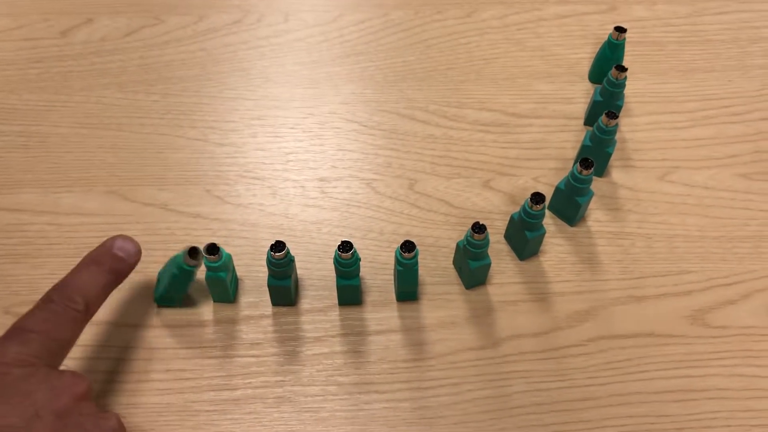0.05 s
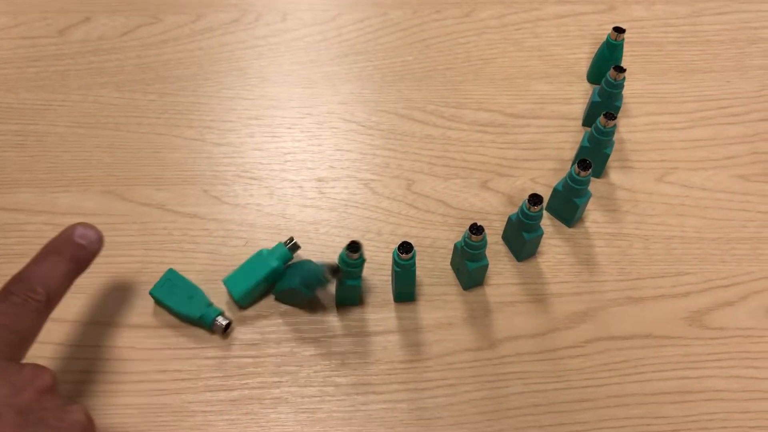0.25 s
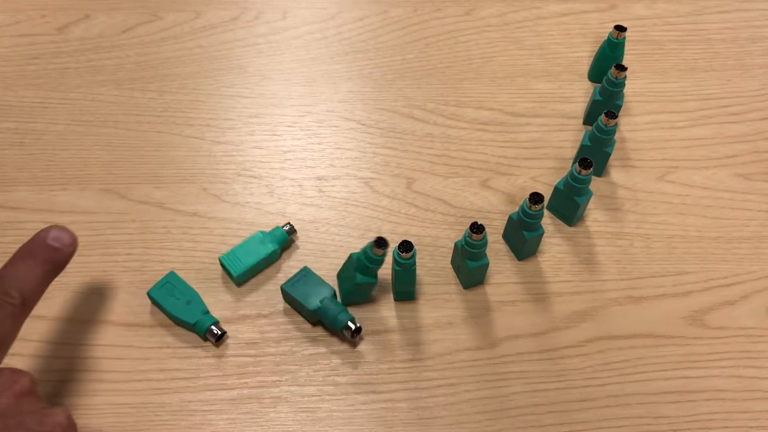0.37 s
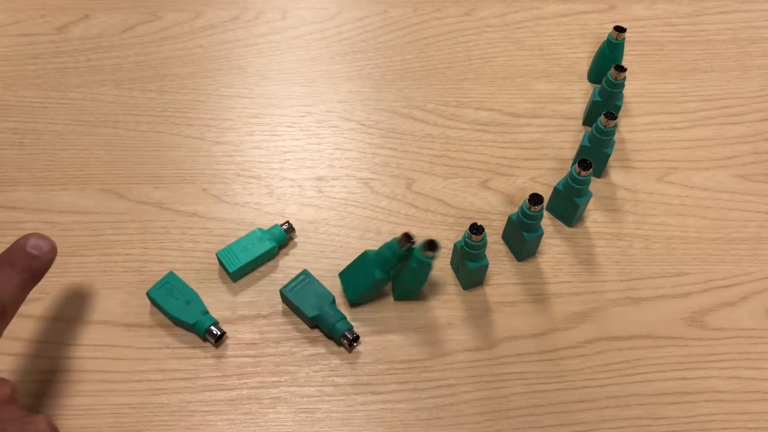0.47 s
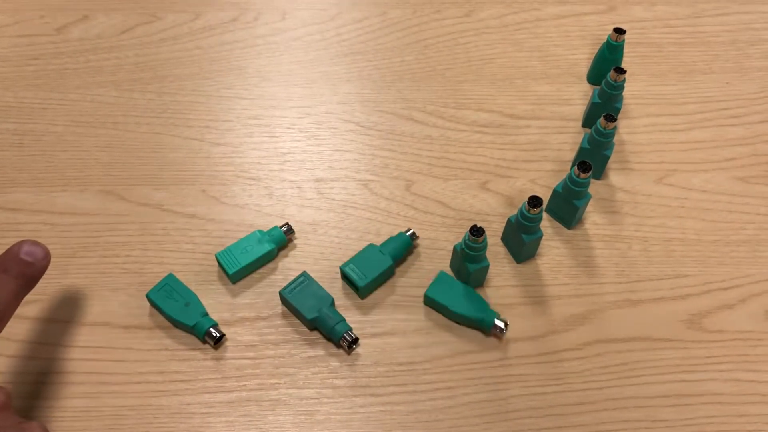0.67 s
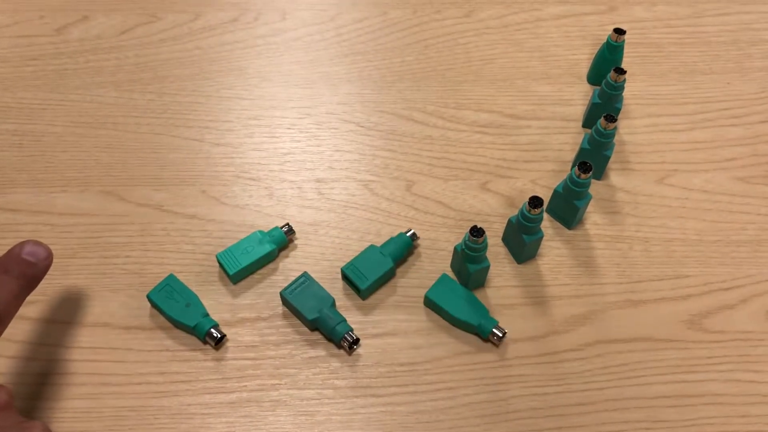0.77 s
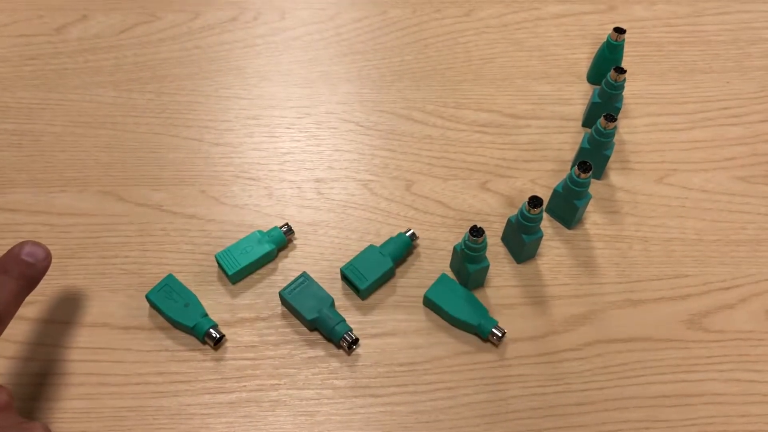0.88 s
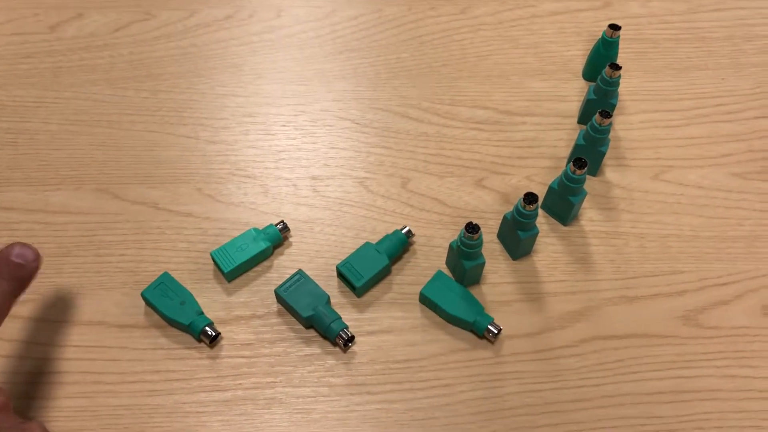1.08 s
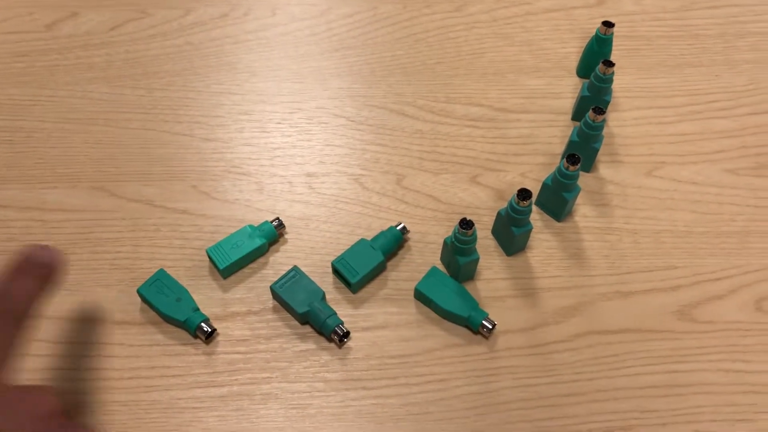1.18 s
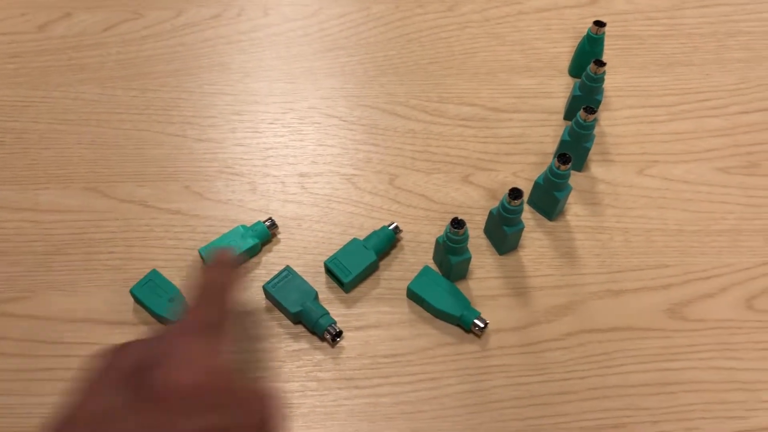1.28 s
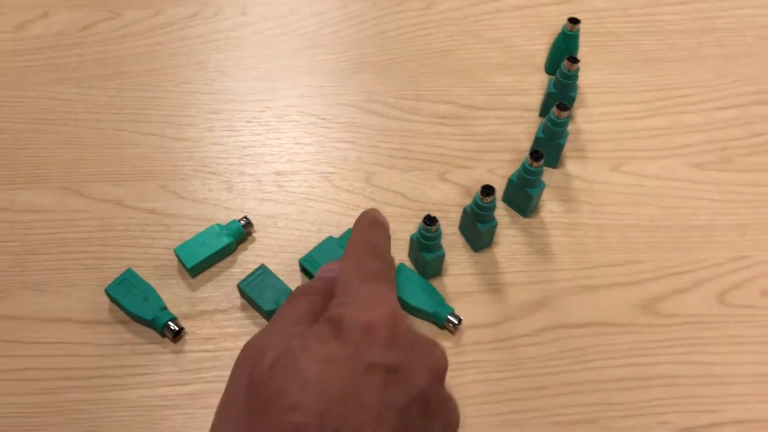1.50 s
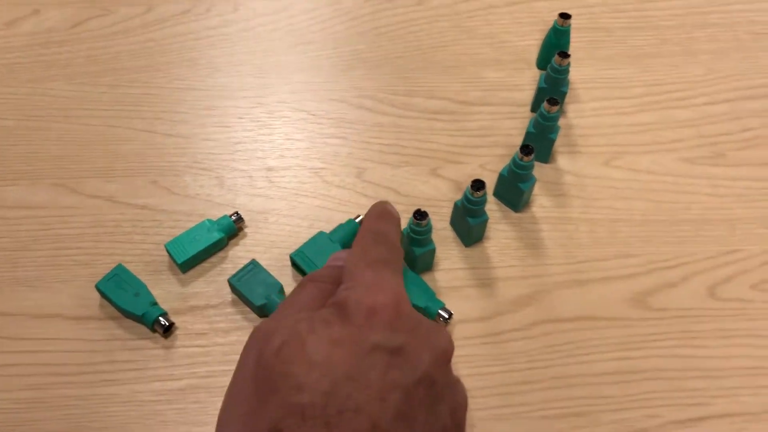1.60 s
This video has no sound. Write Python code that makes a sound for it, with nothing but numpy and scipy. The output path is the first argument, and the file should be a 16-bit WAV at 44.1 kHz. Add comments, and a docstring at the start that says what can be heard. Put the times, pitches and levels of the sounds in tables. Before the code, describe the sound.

Small plastic adapters with metal plugs topple like dominoes on a wooden table, in a fast run of clacks and rattles. After a tiny pause the last one lands and bounces to rest. Heard close in a quiet room.

```python
"""A quiet room, close to a wooden table: small plastic adapters with metal plugs topple like dominoes.
Each contact sends bending waves through the table top (a knock) and rings an adapter's shell (a tick).
Five fall in a rattling run, skidding, their loose plugs chattering; the last lands after a short
pause and bounces to rest. The room hums faintly."""
import sys
import numpy as np
from scipy import signal
from scipy.fft import rfft, irfft
from scipy.io import wavfile

SR = 44100
rng = np.random.default_rng(int(sys.argv[2]) if len(sys.argv) > 2 else 0)


def generate_wav(signal):
    """Clip the signal to [-1, 1] and save it as 16-bit WAV at the path in sys.argv[1]."""
    frames = np.transpose(np.atleast_2d(signal))
    scaled = np.clip(frames, -1, 1) * 32767
    pcm = np.round(scaled).astype(np.int16)
    wavfile.write(sys.argv[1], SR, pcm)


N = 72765
HIT_SAMPLES = 16384
HIT_S, HIT_HZ = np.arange(HIT_SAMPLES) / SR, np.fft.rfftfreq(HIT_SAMPLES, 1 / SR)
SCENE_S = np.arange(N) / SR


def amp(db):
    """Decibels to gain."""
    return 10 ** (np.asarray(db) / 20)


def unit_energy(x):
    """Scales a sound to energy 1."""
    return x / np.sqrt(np.sum(x ** 2) + 1e-20)


def decay(time_s, t60_s):
    """Envelope that falls 60 dB in t60_s."""
    return np.exp(-np.log(1000) * time_s / t60_s)


def curve_at(rows, hz):
    """Interpolates a table's second column over log frequency."""
    columns = np.transpose(rows)
    return np.interp(np.log(hz + 1), np.log(columns[0]), columns[1])


def colour(x, gain):
    """Minimum-phase filter with the given gain over HIT_HZ."""
    mirrored = np.r_[gain, gain[-2:0:-1]]
    log_gain = np.log(np.maximum(mirrored, 1e-5))
    response = np.exp(np.conj(signal.hilbert(log_gain)))
    taps = np.fft.ifft(response).real[:HIT_SAMPLES // 4]
    return signal.fftconvolve(x, taps)[:len(x)]


def reflections(t60_rows, rise_s, samples):
    """Dense reflections swell briefly, then die at each band's own rate."""
    hz, time_s, bands = signal.stft(rng.standard_normal(samples), SR, nperseg=samples // 128)
    bands = bands * decay(time_s, curve_at(t60_rows, hz)[:, None])
    tail = signal.istft(bands, SR)[1][:samples]
    swell = 1 - np.exp(-(np.arange(samples) / SR / rise_s) ** 2)
    return unit_energy(tail * swell)


def ring(modes, detune):
    """Struck modes as damped sines, each mistuned by a random fraction of spread detune."""
    sound = np.zeros(HIT_SAMPLES)
    for hz, db, t60_s in modes:
        tuned_hz = hz * (1 + detune * rng.standard_normal())
        sound += amp(db) * decay(HIT_S, t60_s) * np.sin(2 * np.pi * tuned_hz * HIT_S)
    return unit_energy(sound)


# Room noise spectrum. Each row: frequency in Hz, relative density in dB.
NOISE_SPECTRUM = [(25, -23.5), (45, -9), (65, -6.5), (100, -6.5), (135, -12), (200, -13.5), (280, -16),
                  (400, -21), (700, -28.5), (1200, -32), (2000, -36.5), (10000, -44), (16000, -52.5)]


def background(noise_db=-62, hum_db=-59.5, hum_hz=99.6):
    """Low room rumble, faint hiss and mains hum."""
    gain = amp(curve_at(NOISE_SPECTRUM, np.fft.rfftfreq(N, 1 / SR)))
    noise = irfft(rfft(rng.standard_normal(N)) * gain, N)
    hum = np.sin(2 * np.pi * (hum_hz * SCENE_S + rng.random()))
    return np.sqrt(N) * (amp(noise_db) * unit_energy(noise) + amp(hum_db) * unit_energy(hum))


# Reverberation bands. Each row: frequency in Hz, gain in dB, T60 in seconds.
ROOM_BANDS = [(100, 0.5, 0.92), (200, 1, 0.81), (350, -1.5, .28), (600, 0, .28), (1000, 1, 0.24),
              (1678, -3, 0.62), (3100, -8.5, 0.52), (4200, -9, 0.56), (6000, -7.5, 0.44), (9800, -8.5, .33),
              (16000, -8, 0.12)]


def room(x):
    """Reverberation of a small furnished room."""
    tail = reflections([(hz, t60_s) for hz, _, t60_s in ROOM_BANDS], rise_s=0.0093, samples=SR)
    tail = colour(tail, amp(curve_at(ROOM_BANDS, HIT_HZ)))
    return signal.fftconvolve(x, tail)[:N]


# Direct path and edge returns. Each row: travel time at 1 kHz in seconds, relative level in dB.
WAVE_PATHS = [(.00125, -1.5), (.0039, -7.5), (.0053, -10.5), (.0075, -12.5), (0.0095, -17)]


def bending_waves(path_spread=0.06):
    """Dispersive waves cross the table top, treble first, and return from its edges."""
    spectrum = 0
    for travel_s, db in WAVE_PATHS:
        delay_s = travel_s * np.exp(path_spread * rng.standard_normal())
        spectrum += amp(db) * np.exp(-4j * np.pi * delay_s * np.sqrt(HIT_HZ * 1000))
    waves = irfft(spectrum * HIT_HZ / (HIT_HZ + 60))  # 60 Hz high-pass
    return unit_energy(waves * (HIT_S < HIT_S[-1] / 2))


# Table top resonances. Each row: frequency in Hz, relative level in dB, T60 in seconds.
TOP_MODES = [(85.8, -11.5, .5), (144.3, -6, 0.32), (241.5, -3, 0.17), (361, -0.5, .13), (385.5, -3.5, .12),
             (692, -7, .1), (903, 2, 0.057), (992, -6.5, 0.14), (1389, 3.5, 0.16), (1505, 2, 0.18),
             (1783, -0.5, .2), (2166, -2.5, 0.19), (2544, -5, 0.29), (2670, -12, 0.25), (2912, -3.5, 0.2),
             (3460, -4, 0.14)]
# Decay of scattered waves. Each row: frequency in Hz, T60 in seconds.
SCATTER_DECAY = [(100, 0.055), (400, 0.049), (1200, 0.044), (3000, 0.035), (6000, 0.016), (15000, 0.024)]
# Colour of a knock. Each row: frequency in Hz, relative gain in dB.
WOOD_SPECTRUM = [(25, -47), (60, -20.5), (130, -4), (190, -8), (280, -1), (480, -3.5), (700, -2),
                 (950, 0.5), (1400, -2.5), (2700, 0.5), (4000, 2), (8000, -3), (16000, -20)]


def knock(cutoff_hz, tilt_db_per_oct, scatter_db=-3.5, ring_db=-13.5):
    """A blow on wood: bending waves scatter and leave the table top ringing."""
    body = bending_waves()
    body += amp(scatter_db) * reflections(SCATTER_DECAY, rise_s=0.0015, samples=HIT_SAMPLES)
    body += amp(ring_db) * ring(TOP_MODES, detune=0)
    tilt_db = tilt_db_per_oct * np.log2(HIT_HZ + 170)  # levels off below 170 Hz
    gain = amp(curve_at(WOOD_SPECTRUM, HIT_HZ) + tilt_db)
    gain /= np.sqrt(1 + (HIT_HZ / cutoff_hz) ** (2 * 4.92))  # low-pass of order 4.92
    return unit_energy(colour(body, gain / gain.max()))


# Skids. Each row: start in seconds, end in seconds, median energy of one slip in dB.
SKIDS = [(0.156, 0.187, -26.5), (0.253, 0.321, -27.5), (0.369, 0.418, -24.5), (0.502, 0.562, -21.5),
         (0.855, 0.883, -28)]


def sliding(slips_per_s=700, spread_db=2.5):
    """Leaning adapters skid over the wood in tiny slips, each a faint knock."""
    chance = rng.random(N)
    sizes = amp(spread_db * rng.standard_normal(N)) * np.sign(rng.standard_normal(N))
    slips = np.zeros(N)
    for start_s, end_s, db in SKIDS:
        active = (SCENE_S > start_s) & (SCENE_S < end_s)
        slips += amp(db) * sizes * active * (chance < slips_per_s / SR)
    return signal.fftconvolve(slips, knock(cutoff_hz=2650, tilt_db_per_oct=0))[:N]


# Shell and plug resonances. Each row: frequency in Hz, relative level in dB, T60 in seconds.
ADAPTER_MODES = [(3640, -4.5, 0.037), (5130, 3.5, 0.014), (5326, -5.5, 0.0049), (7320, -2, 0.014),
                 (8150, 0, 0.0093), (9770, -3, 0.011), (11620, -4, 0.015), (14770, -9.5, 0.013)]


def tick(centre_hz, width_oct, crack_db=7.5, cutoff_hz=13000):
    """A sharp crack and a hollow shell's brief ring; the contact point sets the brightest band."""
    crack = unit_energy(rng.standard_normal(HIT_SAMPLES) * decay(HIT_S, t60_s=0.0082))
    shell = ring(ADAPTER_MODES, detune=0.024)
    offset_oct = np.log2((HIT_HZ + 1) / centre_hz)
    gain = 1 / (1 + (offset_oct / width_oct) ** 2)
    gain /= np.sqrt(1 + (HIT_HZ / cutoff_hz) ** 6)
    return unit_energy(colour(shell + amp(crack_db) * crack, gain))


# Plug rattles. Each row: start in seconds, end in seconds, ticks per second, median tick energy in dB.
PLUG_RATTLES = [(.24, .43, 430, -40.5), (.475, 0.533, 930, -34), (0.527, 0.566, 900, -39.5),
                (.70, 0.788, 400, -46.5)]


def plug_chatter(spread_db=4):
    """Loose plugs tick at random as the fallen adapters settle."""
    chance = rng.random(N)
    sizes = amp(spread_db * rng.standard_normal(N))
    clicks = np.zeros(N)
    for start_s, end_s, ticks_per_s, db in PLUG_RATTLES:
        active = (SCENE_S > start_s) & (SCENE_S < end_s)
        clicks += amp(db) * sizes * active * (chance < ticks_per_s / SR)
    return signal.fftconvolve(clicks, tick(centre_hz=6900, width_oct=0.46))[:N]


# Adapter contacts. Each row: start in seconds, knock energy in dB, knock cutoff in Hz, knock tilt in
# dB per octave, tick energy in dB, tick centre in Hz, tick half-width in octaves.
IMPACTS = [ (.1580, -9.5, 2591, -4, -19, 12000, .5), (.2050, -13, 2673, -3.5, -27.5, 8070, .45),
           (0.2242, -16, 2197, -3.5, -37.5, 9000, .6), (0.2307, -17.5, 2620, -4.5, -27.5, 10000, 0.81),
           (0.2379, -5, 3700, -1, -9, 10500, .9), (0.255, -15.5, 2670, -3, -23.5, 8334, .7),
           (0.2645, -9.5, 3418, 1, -25.5, 5980, .7), (0.3051, -14.5, 2800, -5, -29.5, 6560, .6),
           (.3230, -8, 3168, -2.5, -13.5, 7450, .8), (0.3289, -13, 1888, -1, -25.5, 12030, .6),
           (.3435, 3.5, 3834, .5, -21.5, 4800, .4), (0.3647, -12, 3390, 0, -22.5, 6483, .4),
           (0.3796, 0.5, 2715, 0, -0.5, 7330, .6), (0.3897, -24.5, 2407, -1.5, -23.5, 11910, .4),
           (.4163, -5, 3200, -2.5, -22.5, 6506, .6), (0.4337, 8.5, 2714, -0.5, -5, 5600, .7),
           (0.4649, -6, 3027, 2, -22, 7470, .6), (0.472, -1, 3582, -0.5, 1.5, 6310, .6),
           (0.485, -24, 3020, -2.5, -21, 7540, .5), (0.4949, 1.5, 2900, 0.5, -16.5, 5925, .5),
           (.5020, -6, 2800, 0.5, -8, 7736, .35), (0.5083, -12.5, 2570, 3.5, -20.5, 8846, .3),
           (0.5155, -17.5, 2768, 0.5, -15, 6854, .25), (0.5282, -5.5, 2340, -.5, -23.5, 7880, .5),
           (0.5403, -13.5, 3047, 1.5, -17.5, 6847, .45), (0.5472, -16.5, 2553, -1.5, -27.5, 6910, .5),
           (0.6286, -15, 1577, -2.5, -51, 7040, .6), (0.6338, -12.5, 1900, -2.5, -46, 11000, .6),
           (0.647, -15, 1700, -1, -44, 10620, .4), (.6825, 8.5, 3400, -.5, -8, 4825, 0.81),
           (0.6941, 8.5, 4008, 0, -2.5, 4800, .55), (0.7315, -0.5, 2822, -0.5, -20, 5515, .6),
           (0.7358, -12, 2657, -4, -27.5, 8610, .3), (0.759, -11, 2910, -2.5, -42, 4500, .5),
           (.7732, 4.5, 3385, 1.86, -11.5, 4800, .8), (0.7965, -19, 3704, 6, -41, 4500, .5),
           (0.8221, -1.5, 3605, -0.4, -15, 5030, .5), (0.849, -14, 2942, 1.5, -34, 6080, .6),
           (0.852, -12, 2660, 0, -38, 6010, .6), (0.8631, -14.5, 2782, -3.5, -43, 7000, .5),
           (0.8701, -23.5, 2800, 1, -36, 6000, .5)]


def toppling_adapters():
    """Each contact knocks the table top and ticks a shell; returns the two layers."""
    knocks, ticks = np.zeros(N), np.zeros(N)
    for start_s, knock_db, cutoff_hz, tilt_db_per_oct, tick_db, centre_hz, width_oct in IMPACTS:
        onset = round(start_s * SR)
        span = slice(onset, onset + HIT_SAMPLES)
        knocks[span] += amp(knock_db) * knock(cutoff_hz, tilt_db_per_oct)
        ticks[span] += amp(tick_db) * tick(centre_hz, width_oct)
    return knocks, ticks


def scene(wood_send_db=-10.5, shell_send_db=-13.5):
    """Mono mix; the broad table top fills the room more than the little shells do."""
    knocks, ticks = toppling_adapters()
    shells = ticks + plug_chatter()
    wood = knocks + sliding()
    reverb = room(amp(wood_send_db) * wood + amp(shell_send_db) * shells)
    return (wood + shells + reverb + background())[None]


def record(dry):
    """Low-pass at 15.7 kHz."""
    taps = signal.firwin(255, 15700, window=("kaiser", 8), fs=SR)
    return signal.oaconvolve(dry, taps[None], "same")


dry = scene()
out = record(dry)
generate_wav(out)
```